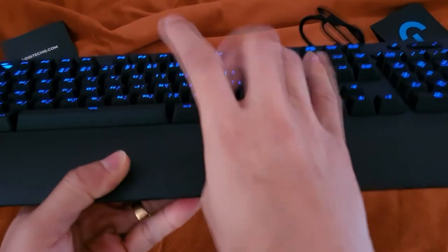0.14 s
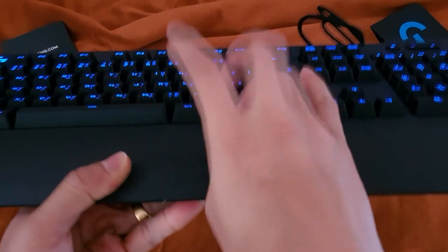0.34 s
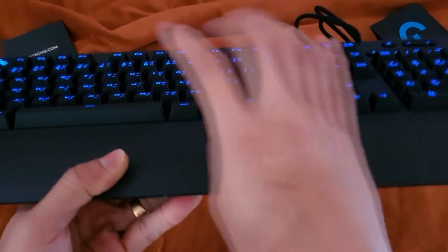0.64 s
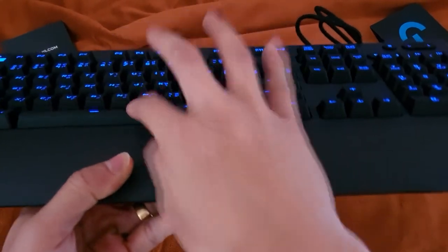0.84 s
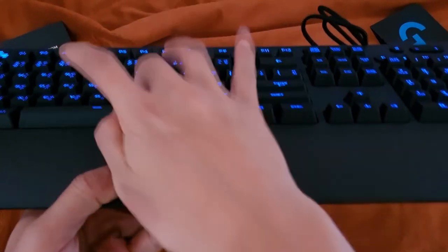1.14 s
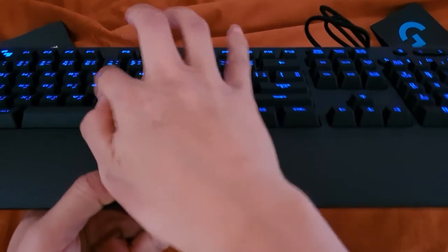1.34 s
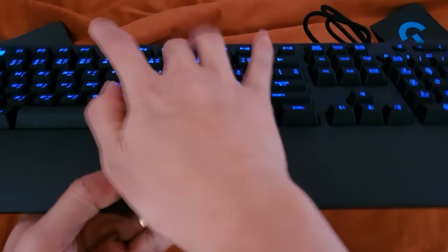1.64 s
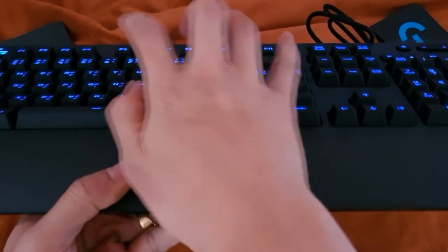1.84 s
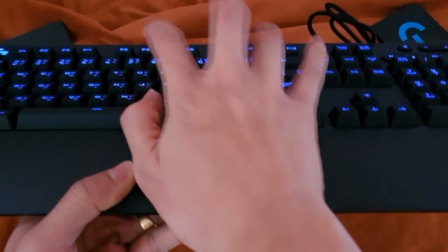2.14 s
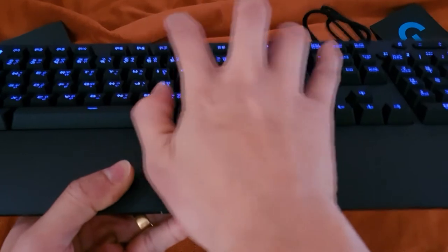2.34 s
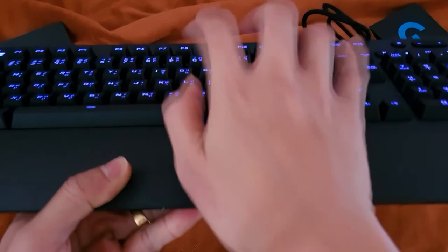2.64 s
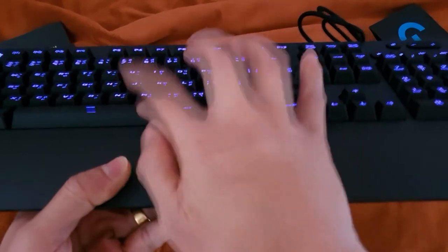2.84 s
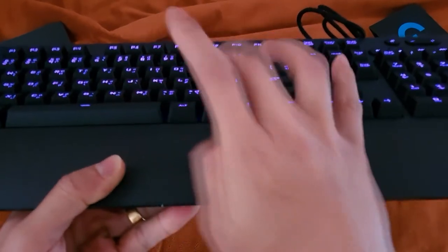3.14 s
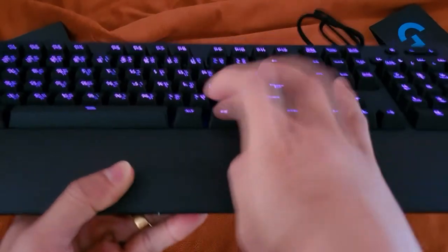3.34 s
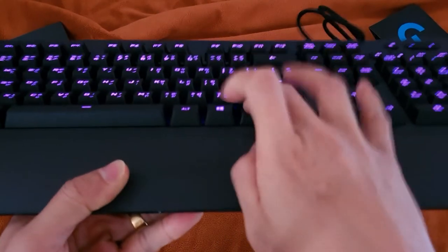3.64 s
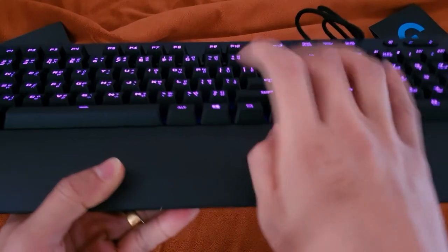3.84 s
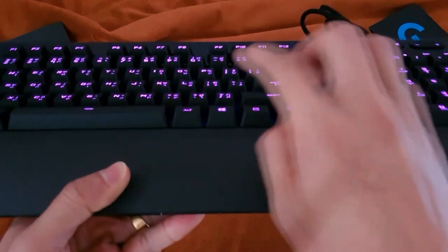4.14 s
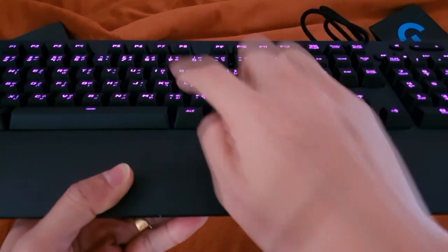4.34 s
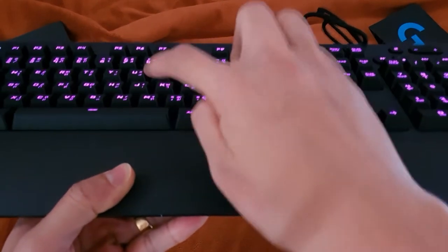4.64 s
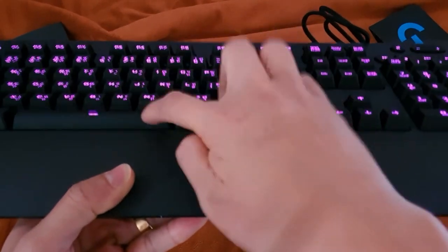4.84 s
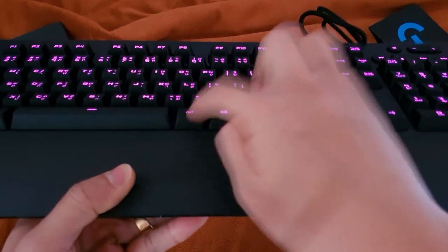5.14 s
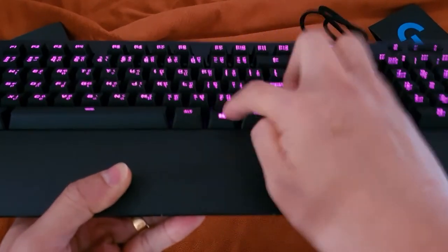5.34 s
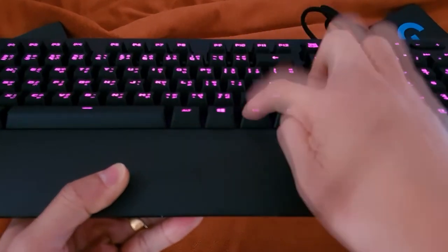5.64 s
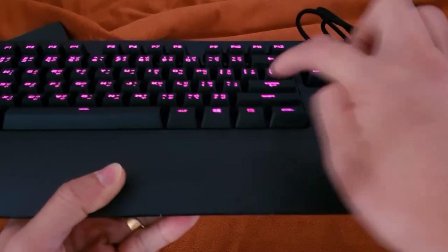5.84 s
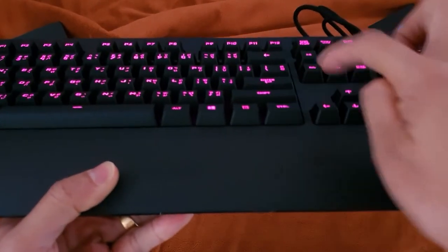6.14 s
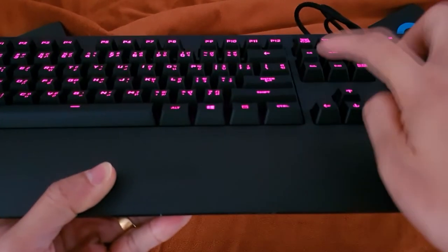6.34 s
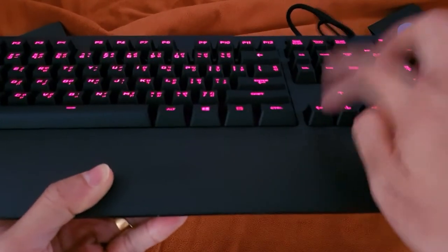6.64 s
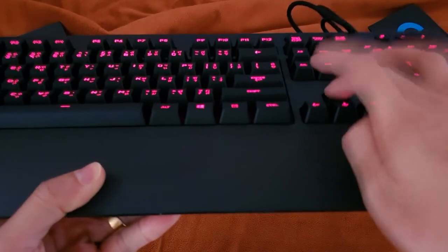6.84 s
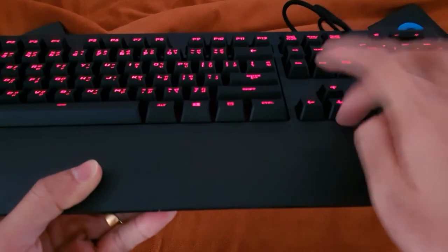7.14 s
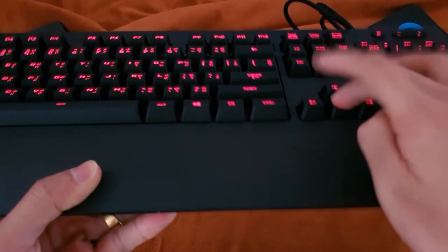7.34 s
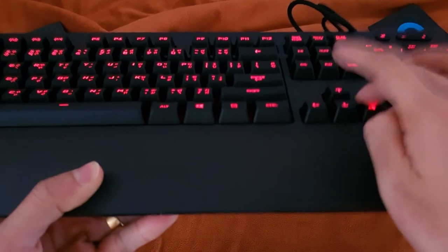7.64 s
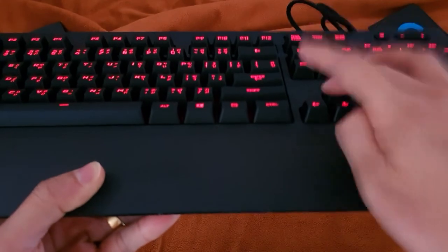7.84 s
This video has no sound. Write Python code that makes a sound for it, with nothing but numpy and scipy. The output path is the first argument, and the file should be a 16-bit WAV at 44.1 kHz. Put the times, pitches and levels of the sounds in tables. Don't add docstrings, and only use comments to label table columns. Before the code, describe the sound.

Mechanical key presses in a small quiet room, heard close: a hollow case knock, a brighter cap clack and a crisp return click, often louder than the press. The pace stays loose and uneven, with harder strokes around the middle and a short spring hiss. Moving fingers bump the air softly, mostly on the left, bedding stirs more later, and tapping continues to the end.

```python
import sys
import numpy as np
from scipy import signal
from scipy.fft import rfft, irfft
from scipy.io import wavfile
from scipy.ndimage import uniform_filter1d

SR = 44100
rng = np.random.default_rng(int(sys.argv[2]) if len(sys.argv) > 2 else 0)


def store_wav(level_fs):
    pcm = np.round(np.clip(np.atleast_2d(level_fs), -1, 1) * 32767)
    wavfile.write(sys.argv[1], SR, pcm.T.astype(np.int16))


def field_ratio(decibels):
    return 10 ** (np.asarray(decibels, dtype=float) / 20)


N = 352800


def evened(x):
    return x / np.sqrt(np.mean(x ** 2) + 1e-20)


def read(points, hz):
    f, value = np.transpose(points)
    return np.interp(np.log(hz + 1), np.log(f + 1), value)


def add(mix, s, sound):
    part = mix[..., round(s * SR):][..., :sound.shape[-1]]
    part += sound[..., :part.shape[-1]]


def air():
    # (frequency [Hz], density [dB per Hz])
    tone = [(15, -14), (25, -7), (64, 0), (130, -8.5), (200, -10), (242, -16.5), (309, -9), (416, -13),
            (818, -14.5), (911, -17), (2990, -29.5), (5430, -46), (8200, -44), (8750, -66.5),
            (16000, -85.5)]
    # (frequency [Hz], correlation [-1 to 1])
    likeness = [(60, 0.91), (130, 0.89), (290, 0.94), (640, 0.16), (1410, -0.44), (3100, 0.068),
                (6820, -0.089), (15000, 0.96)]
    # (frequency [Hz], width [Hz], level [dB])
    hums = [(48.9, 8, -56.5), (80.5, 6, -59), (133, 20, -65.5), (194.7, 5.1, -64.5), (300, 73, -65),
            (11800, 450, -100)]
    # (time [s], level [dB])
    rustle = [(0.0, -80), (0.13, -69), (0.27, -75), (0.91, -75.5), (2.34, -71.5), (2.5, -77), (4.43, -74),
              (5.03, -68.5), (5.35, -65.5), (5.5, -74.5), (6.11, -67.5), (6.57, -67.5), (6.75, -74),
              (7.04, -66), (7.31, -66.5), (7.64, -74.5), (8.0, -70)]
    tone_db = -53
    frames, hz = N // 2048 + 5, np.fft.rfftfreq(8192, 1 / SR)
    a, b, c, d, patches = rng.standard_normal((frames, 4097, 5)).T
    patches = uniform_filter1d(patches, size=80, axis=0)
    patches = evened(uniform_filter1d(patches, size=3, axis=1))
    same = np.clip(read(likeness, hz), -1, 1)[:, None]
    left = a + 1j * b
    right = same * left + np.sqrt(1 - same ** 2) * (c + 1j * d)
    power = field_ratio(read(tone, hz)) ** 2
    power *= field_ratio(tone_db) ** 2 / power.sum()
    for f, width, db in hums:
        bump = np.exp(-2 * ((hz - f) / width) ** 2)
        power += field_ratio(db) ** 2 * bump / bump.sum()
    stir_db = np.interp(np.arange(frames) * 2048 / SR, *np.transpose(rustle)) + 72
    cloth = np.exp(-(np.log2((hz + 1) / 3000) / 1.7) ** 2)[:, None]
    patch_db = 1.2 * np.clip(hz / 600, .2, 1)[:, None] * patches
    shaped = np.array([left, right]) * np.sqrt(power)[:, None] * field_ratio(patch_db + cloth * stir_db)
    return signal.istft(shaped, nperseg=8192, noverlap=6144)[1][:, :N] * 0.9


def room(x):
    # (frequency [Hz], t60 [s])
    decay = [(250, 0.25), (700, 0.2), (1800, 0.28), (4500, 0.24), (10000, 0.27), (13000, .2), (16000, 0.22)]
    # (frequency [Hz], correlation [0 to 1])
    likeness = [(300, 1), (700, 0.76), (1500, 0.22), (3000, 0.078)]
    out, turn = np.zeros((2, N)), np.arange(N) / SR * 7.3
    for k in range(3):
        taps = np.zeros((2, SR // 2))
        at = np.arange(90, SR // 2 - 20, 20) + rng.integers(0, 20, (2, (SR // 2 - 91) // 20))
        np.put_along_axis(taps, at, rng.choice([-1., 1.], at.shape), 1)
        hz, t, z = signal.stft(taps, SR, nperseg=256)
        same = np.clip(read(likeness, hz), 0, 1)[:, None]
        z[1] = same * z[0] + np.sqrt(1 - same ** 2) * z[1]
        fade = field_ratio(-60 * t / read(decay, hz)[:, None])
        tail = signal.istft(z * fade, SR, nperseg=256)[1]
        tail = tail / np.linalg.norm(tail, axis=1)[:, None]
        share = np.sqrt(2 / 3) * np.cos(turn + k * np.pi / 3)
        out += signal.oaconvolve(x * share, tail, axes=1)[:, :N]
    return out


def puffs():
    # (time [s], peak level [dB])
    left_puffs = [(0.118, -40.5), (0.158, -46), (0.927, -37), (2.282, -40), (2.318, -40), (2.358, -41),
                  (2.435, -32), (2.515, -40), (2.618, -45), (3.088, -43), (3.193, -51), (3.595, -49),
                  (4.681, -30), (4.757, -30.5), (4.83, -38), (4.96, -33.5), (5.017, -33), (5.057, -34),
                  (5.102, -32), (5.526, -42), (5.572, -45), (6.364, -41), (6.389, -33.5), (6.473, -30.5),
                  (6.564, -42), (6.631, -37.5), (6.77, -37), (6.823, -44), (7.008, -42), (7.083, -38.5)]
    # (time [s], peak level [dB])
    right_puffs = [
        (0.322, -32.5),
        (0.87, -38),
        (2.679, -45),
        (5.255, -40),
        (5.277, -47),
        (5.382, -37),
        (6.352, -42),
        (6.442, -46),
    ]
    puff_hz = (64.4, 55.7)
    out, t = np.zeros((2, N)), np.arange(-2000, 2000) / SR
    for port, table in enumerate((left_puffs, right_puffs)):
        hz = puff_hz[port]
        for s, db in table:
            dip = -np.cos(2 * np.pi * hz * t - .3) * np.exp(-(1.66 * hz * t) ** 2)
            add(out[port], max(s + t[0], 0), field_ratio(db) * dip)
    return out


def springs():
    # (time [s], level [dB], frequency [Hz], t60 [s])
    hisses = [
        (2.457, -67.5, 6060, 1),
        (2.557, -69, 5460, 0.32),
        (3.659, -34, 6840, 0.054),
    ]
    out, t, f = np.zeros((2, N)), np.arange(SR // 2) / SR, np.fft.rfftfreq(SR // 2, 1 / SR)
    for s, db, hz, t60 in hisses:
        band = 1 / (1 + ((f - hz) / 450) ** 2)
        song = irfft(rfft(rng.standard_normal((2, len(t)))) * band)
        add(out, s, evened(song) * field_ratio(db - 60 * t / t60))
    return out


def ring(modes, db, centre_hz, lag, reach, scatter_db, rise, rattle, span):
    hz, mode_db, t60 = np.transpose(modes)[:, :, None]
    chance = rng.standard_normal((len(hz), 6))
    when, size = rng.random((2, 4))
    hz = hz * (1 + .015 * chance[:, :1])
    mode_db = mode_db - reach * abs(np.log2(hz / centre_hz)) + scatter_db * chance[:, 1:2]
    blows = np.zeros(900)
    rebounds = (np.clip(span, 0, .02) * (SR - 50) * when).astype(int)
    np.add.at(blows, rebounds, rattle * (size - .4))
    blows[0] += 1
    blows = np.convolve(blows, np.hanning(8))
    ports = []
    for port, delay in enumerate((lag, 0)):
        t = np.maximum(np.arange(3000) - 60 - delay, 0) / SR
        aslant = hz / 3000
        phase = 1.13 * aslant * chance[:, 2 + port:3 + port]
        uneven_db = 1.5 * aslant * chance[:, 4 + port:5 + port]
        quick = 8.4 * np.exp(-np.log(1000) * t / (0.5 * t60))
        fade = np.exp(-np.log(1000) * t / t60) + quick
        waves = field_ratio(mode_db + uneven_db) * fade * np.sin(2 * np.pi * hz * t + phase)
        onset = 1 - np.exp(-(t / rise) ** 2)
        ports.append(signal.fftconvolve(waves.sum(0) * onset, blows)[:3000])
    ports = np.array(ports)
    return field_ratio(db) * ports / np.sqrt(np.sum(ports[:, :450] ** 2) / 440)


def grit(db, colour_db, lag, rise, burst, tail, tail_db, slide_db, apart):
    t, hz = np.arange(-1000, 6000) / SR, np.fft.rfftfreq(7000, 1 / SR)
    both, own, grains, bumps = rng.standard_normal((4, 7000))
    bumps_db = 2.2 * evened(uniform_filter1d(bumps, size=90))[:len(hz)]
    after = np.maximum(t, 0)
    shape = np.exp(-after / burst) + field_ratio(tail_db) * np.exp(-after / tail)
    shape *= 1 - np.exp(-(after / rise) ** 2)
    shape += field_ratio(slide_db) * np.exp(-abs(t) / 0.002)
    shape *= field_ratio(4.1 * evened(uniform_filter1d(grains, size=30))) * signal.windows.tukey(7000, .2)
    delay = np.array([np.exp(-2j * np.pi * hz * lag / SR), np.ones(len(hz))])
    noise = shape * np.array([both, both + apart * own])
    ports = irfft(rfft(noise) * field_ratio(colour_db(hz) + bumps_db) * delay)
    ports = ports / np.sqrt(np.sum(ports[:, 1000:1450] ** 2, axis=1, keepdims=True) / 220)
    shaded = signal.lfilter([.8], [1, -.2], ports[0])
    return field_ratio(db) * np.array([shaded, ports[1]])


def contacts():
    # (time [s], case level [dB], case centre [Hz], cap level [dB], cap centre [Hz])
    presses = [(0.0339, -25.5, 740, -32.5, 1630), (0.3124, -37, 660, -43, 2450),
               (0.8623, -41, 800, -37, 2830), (1.1384, -35.5, 523, -44.5, 1970),
               (1.6688, -40, 620, -38, 2150), (1.9533, -42.5, 810, -40.5, 1800),
               (2.231, -42.5, 680, -37.5, 2700), (2.4572, -38, 450, -35, 1450),
               (2.9047, -36.5, 557, -34, 2730), (3.2914, -46.5, 765, -51, 2460),
               (3.6584, -30, 800, -28.5, 1280), (3.9345, -37, 950, -34.5, 1540),
               (4.515, -32.5, 600, -36.5, 2200), (4.8633, -30, 740, -35, 2700),
               (5.1061, -41, 706, -40, 2360), (5.3472, -40, 645, -41, 2680), (5.6808, -45, 730, -47, 2360),
               (5.9685, -39, 656, -47.5, 1990), (6.5674, -42, 570, -47.5, 2840),
               (6.8735, -37, 720, -40.5, 2050), (7.1334, -43.5, 624, -39.5, 1340),
               (7.364, -44, 690, -37, 3130), (7.6343, -42.5, 580, -46, 2970),
               (7.8676, -38.5, 645, -46.5, 2110)]
    # (time [s], case level [dB], case centre [Hz], cap level [dB], switch tick level [dB])
    releases = [(0.1304, -37.5, 795, -33.5, -41), (0.4004, -37, 730, -36.5, -53.5),
                (0.9622, -27, 714, -30.5, -44), (1.251, -41, 770, -36.5, -39),
                (1.7873, -64, 920, -36.5, -40.5), (2.0639, -46.5, 770, -39, -46),
                (2.3152, -46.5, 700, -43.5, -47.5), (2.558, -28, 740, -36, -32),
                (2.9975, -25.5, 734, -30, -44.5), (3.3878, -34.5, 740, -30.5, -39),
                (3.7083, -28, 855, -32, -33), (3.7359, -33.5, 780, -30.5, -41.5),
                (4.0313, -37.5, 814, -39.5, -50.5), (4.5681, -27, 770, -31.5, -44.5),
                (4.9425, -23, 704, -24.5, -40.5), (5.1864, -32.5, 776, -36, -46.5),
                (5.4324, -35, 620, -33.5, -40), (5.757, -35.5, 730, -35, -46), (6.0348, -44, 540, -38, -51),
                (6.6474, -40, 785, -35.5, -48.5), (6.9506, -35.5, 736, -33, -42),
                (7.4433, -35, 850, -37, -35.5), (7.7103, -44, 680, -49.5, -54.5),
                (7.939, -42, 830, -31, -43)]
    # (time [s],
    # case level [dB], cap level [dB], switch tick level [dB])
    further_contacts = [(0.0479, -54, -57, -45), (0.0632, -62, -56, -49), (1.3142, -70, -58.5, -61),
                        (1.3805, -55, -56, -65), (1.3978, -49, -48, -53.5), (1.5559, -46.5, -45, -51),
                        (1.677, -50, -45.5, -56), (2.3232, -44, -47, -45.5), (2.4534, -42.5, -46, -30.5),
                        (3.283, -52, -53.5, -56), (3.6645, -29.5, -40, -30.5), (3.9822, -55, -54.5, -53),
                        (4.5099, -43, -39, -45.5), (4.5889, -29.5, -35, -42.5), (5.3551, -44, -41, -45.5),
                        (5.6897, -56, -45.5, -49), (5.973, -45, -55, -47), (6.0364, -46, -54, -59),
                        (6.8643, -48, -45, -41.5), (7.1282, -54, -54, -41), (7.174, -44, -54, -58),
                        (7.369, -38, -39, -37.5), (7.4134, -49, -46, -59), (7.42, -49, -50, -67),
                        (7.863, -48, -47, -44)]
    press_tick_db = -2.5
    release_cap_hz, further_case_hz, further_cap_hz = 1710, 680, 2064
    press_top_db, release_top_db, further_top_db, lift_top_db = 0.5, -1.5, -4, -7
    lift_s, lift_db, lift_tick_db, lift_share = 0.0073, -58, -58.5, 0.25

    rows = [(*row, row[3] + press_tick_db, press_top_db) for row in presses]
    for s, case_db, case_hz, cap_db, tick_db in releases:
        rows.append((s, case_db, case_hz, cap_db, release_cap_hz, tick_db, release_top_db))
        force_db = lift_share * (cap_db + 35)
        slip_db = lift_db + force_db
        rows.append((s - lift_s, slip_db, case_hz, slip_db, release_cap_hz,
                     lift_tick_db + force_db, lift_top_db))
    for s, case_db, cap_db, tick_db in further_contacts:
        rows.append((s, case_db, further_case_hz, cap_db, further_cap_hz, tick_db, further_top_db))
    return rows


def keys():
    # (frequency [Hz], level [dB], t60 [s])
    case_modes = [(194, 1.5, 0.043), (302, -17, 0.054), (404, -7.5, 0.13), (516, -1, 0.055),
                  (600, 8, 0.034), (704, 11.5, 0.031), (784, -2, 0.069), (960, 1, 0.041)]
    # (frequency [Hz], level [dB], t60 [s])
    cap_modes = [(1174, -30, 0.0067), (1439, 5, 0.046), (1630, 11.5, 0.0093), (1822, 9.5, 0.014),
                 (2200, 6.5, 0.0046), (2450, 4.5, 0.0078), (2700, -4, 0.05), (2810, 11.5, 0.019),
                 (3213, 8, 0.053)]
    # (frequency [Hz], level [dB])
    switch = [(2800, -7), (3700, 0), (4230, 0), (4800, 1), (5500, 0.5), (6300, -2), (7200, -3),
              (8600, -8.5), (10400, -9.5), (12500, -13), (14300, -15.5), (15900, -13.5), (16500, -28)]
    # (time [s], lag [samples])
    left_lag = [(0, 3.5), (.7, -6.5), (1.7, -1.5), (2.3, 5.5), (4.2, 7.5), (4.8, 5), (5.6, 5), (8, 12)]
    # (time [s], treble level [dB])
    facing = [(0, -5.5), (.9, 1), (2.3, -4.5), (2.9, 3), (4.0, 0), (4.9, 2.5), (5.8, -6), (7.0, -3),
              (8, -0.5)]
    out = np.zeros((2, N))
    scatter_db, lead_s = 1.8, .0014
    for s, case_db, case_hz, cap_db, cap_hz, tick_db, top_db in contacts():
        loose = np.clip((tick_db - cap_db + 22.0) / 14, .1, 1)
        lag = np.interp(s, *np.transpose(left_lag))
        top_db += 0.01 * (tick_db + 39)
        top_db += np.interp(s, *np.transpose(facing))

        def scrape_colour(hz):
            return -13 * abs(np.log2((hz + 1) / cap_hz)) - .004 * np.maximum(hz - 4000, 0)

        def tick_colour(hz):
            return read(switch, hz) + top_db * np.clip((hz - 7000) / 2500, 0, 1)

        knock = ring(case_modes, case_db + 0.17, case_hz, 0.27 * lag, reach=28 - 13 * loose,
                     scatter_db=scatter_db, rise=.0005 + .0016 * loose, rattle=1.96 * loose, span=0.005755)
        knock += ring(cap_modes, cap_db - 0.5 * loose, cap_hz, 0.65 * lag, reach=11.5,
                      scatter_db=scatter_db, rise=0.00021, rattle=0.18 * loose, span=0.0041)
        add(out, s - lead_s, knock)
        scrape = grit(cap_db - 8.0 + 9 * loose, scrape_colour, 0.7 * lag, rise=.0012, burst=0.0029,
                      tail=0.014, tail_db=-12.5, slide_db=-23.5, apart=1.0)
        scrape += grit(tick_db + .3, tick_colour, lag, rise=0.0018, burst=.0019,
                       tail=0.008, tail_db=-17, slide_db=-36, apart=2.8)
        add(out, s - lead_s - 1000 / SR, scrape)
    return out * field_ratio([[.4], [-.4]])


def scene():
    board = keys() + springs()
    return board + field_ratio(-11) * room(board) + puffs() + air()


def gated(x):
    from_hz, gate_db = 8700, -112
    hz, _, z = signal.stft(x, SR, nperseg=1024)
    band = np.searchsorted([0, 9700, 11300, 12200, 13200], hz)
    power = abs(z) ** 2
    levels = [power[:, (band == k) & (hz > from_hz)].mean(axis=1) for k in range(1, 6)]
    level = np.stack(levels, axis=1)[:, np.maximum(band - 1, 0)]
    over_db = 10 * np.log10(level + 1e-20) - gate_db
    over_db -= 4 * (band == 5)[:, None]
    over_db += 4 * (band == 3)[:, None]
    keep = np.where(hz[:, None] > from_hz, np.clip(over_db / 2, .12, 1), 1)
    return signal.istft(z * keep, SR, nperseg=1024)[1][:, :N]


def low_pass(x):
    return signal.sosfilt(signal.butter(12, 17040, fs=SR, output="sos"), x)


def record(dry):
    edge_hz = 16100
    lowpass = signal.firwin(255, edge_hz, window=("kaiser", 8), fs=SR)
    limited = signal.oaconvolve(dry, lowpass[None], "same")
    return low_pass(gated(limited))


dry = scene()
out = record(dry)
store_wav(out)
```